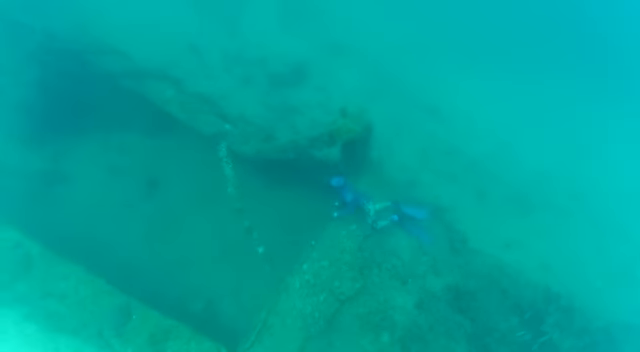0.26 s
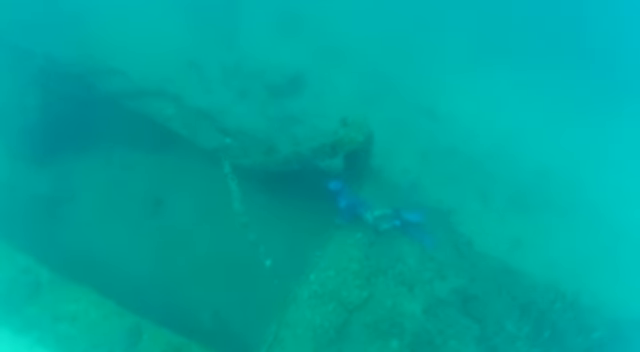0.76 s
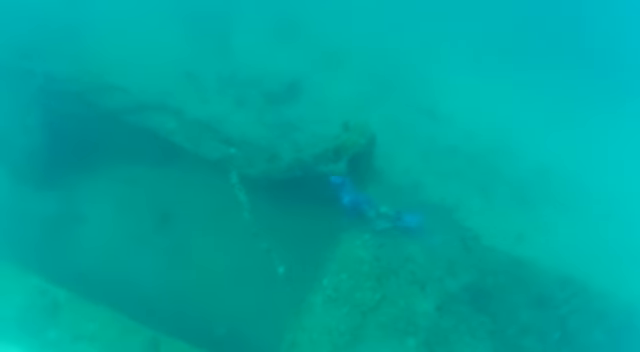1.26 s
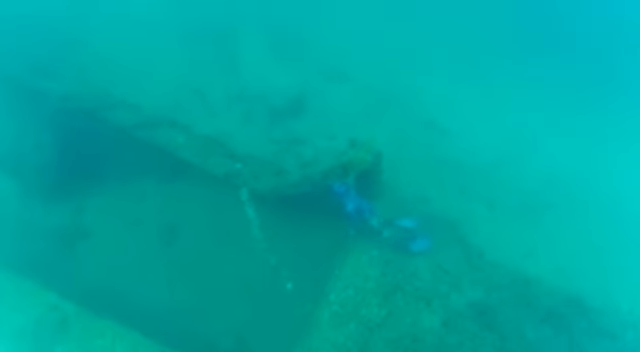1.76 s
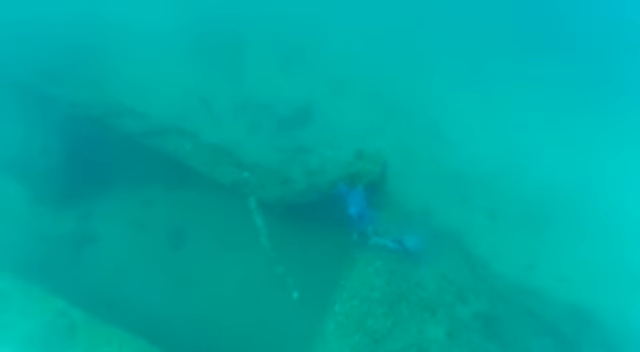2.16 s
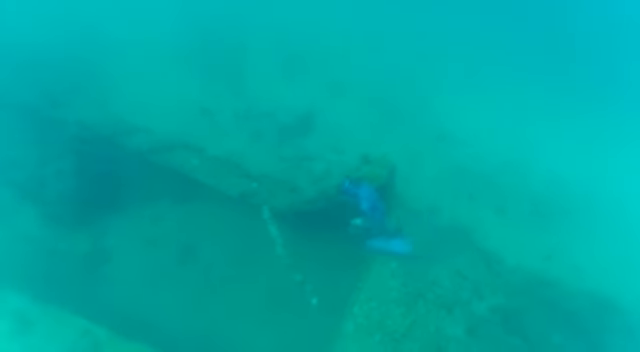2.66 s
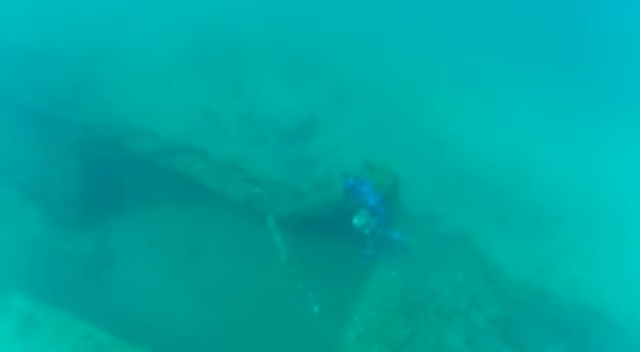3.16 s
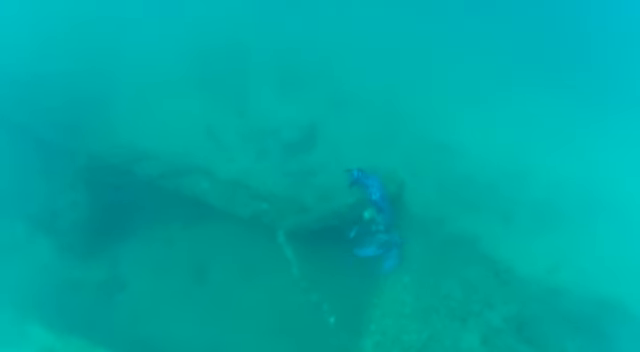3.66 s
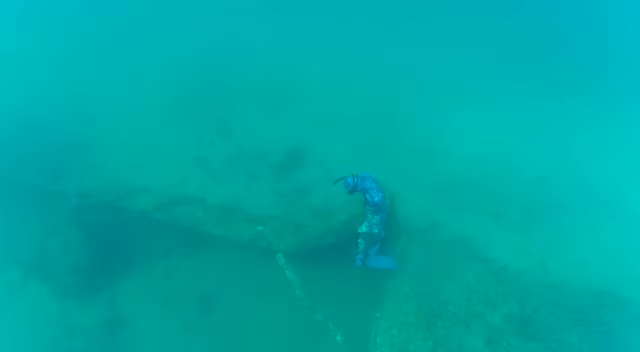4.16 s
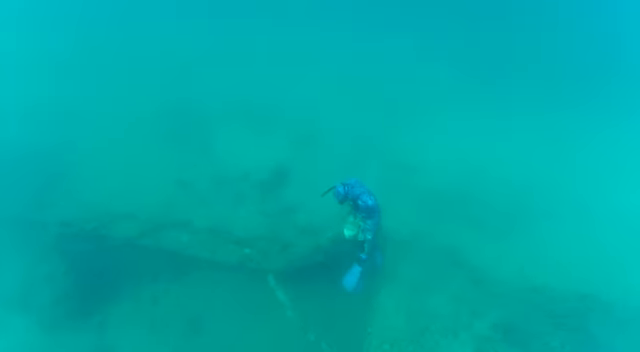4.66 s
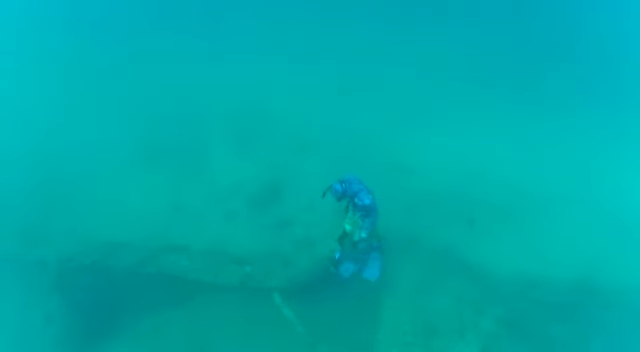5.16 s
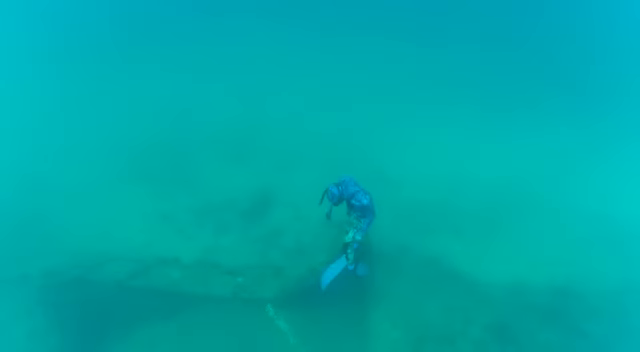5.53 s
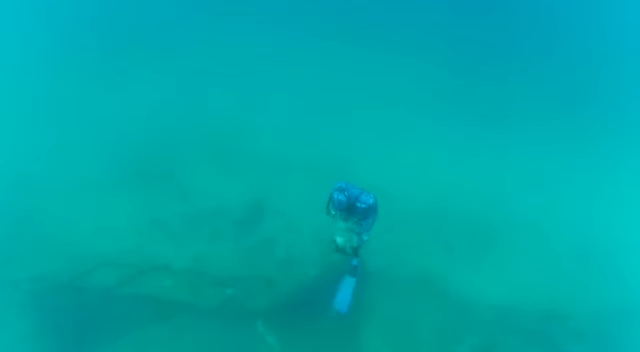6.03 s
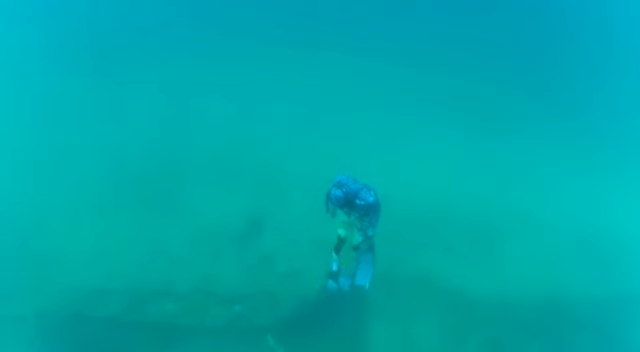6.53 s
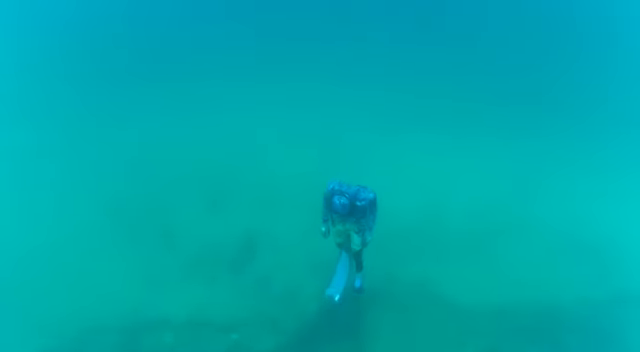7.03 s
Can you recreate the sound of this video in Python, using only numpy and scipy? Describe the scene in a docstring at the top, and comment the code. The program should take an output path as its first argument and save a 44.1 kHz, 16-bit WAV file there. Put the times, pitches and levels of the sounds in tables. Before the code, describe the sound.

A dense crackle of snapping shrimp and scattered dull knocks over low water rumble, heard underwater through a waterproof camera case.

```python
"""Under water above a wreck, heard through a camera's resonant waterproof case. From the start a bed of
snapping shrimp fizzes over the rumble of moving water and the weak hum of a far engine. Sharp snaps close by
and soft low blips (probably far fish) join at once. Then come dull knocks, singly and in short runs, each with
faint echoes, and then faint low murmurs, probably fish too. Near the middle, two soft bumps push on the case;
the shrimp crackle on to the end."""
import sys
import numpy as np
from scipy import signal
from scipy.fft import rfft, irfft
from scipy.io import wavfile

SR = 44100
rng = np.random.default_rng(int(sys.argv[2]) if len(sys.argv) > 2 else 0)


def unload_wav(signal):
    """Save mono or channel-first audio to the path in sys.argv[1] as 16-bit WAV at rate SR, clipped to [-1, 1]."""
    wavfile.write(
        sys.argv[1],
        SR,
        np.round(np.clip(np.atleast_2d(signal).T, -1, 1) * 32767).astype(np.int16),
    )


N = 321489
HZ = np.fft.rfftfreq(N, 1 / SR)
# bands in which snaps differ from one another: (centre frequency [Hz])
BAND_HZ = [1000, 2200, 3700, 5200, 7000, 9800, 14000]


def from_db(db):
    """Amplitude ratio: a factor of ten for every 20 dB."""
    return 10 ** (np.asarray(db) / 20)


def unit_rms(x):
    """Normalisation to rms 1."""
    return x / np.sqrt(np.mean(x ** 2) + 1e-20)


def gain_at(points, hz):
    """Frequency response: gain from (frequency [Hz], level [dB]) points on a log-frequency axis."""
    f, db = np.transpose(points)
    return from_db(np.interp(np.log(hz + 1), np.log(f + 1), db))


def envelope(curve):
    """Amplitude modulation: gain from (time [s], level [dB]) points, relative to their mean level."""
    s, db = np.transpose(curve)
    return from_db(np.interp(np.arange(N) / SR, s, db - np.mean(db)))


def add(mix, s, sound):
    """Superposition: a sound joins the mix at time s."""
    part = mix[max(round(s * SR), 0):][:len(sound)]
    part += sound[:len(part)]


def drift(rate_hz):
    """Slow random fluctuation: low-passed noise of rms 1."""
    return unit_rms(irfft(rfft(rng.standard_normal(N)) * np.exp(-(HZ / rate_hz) ** 2), N))


def minimum_phase(gain):
    """Causality: the minimum-phase impulse response, of energy 1, with this spectral shape."""
    log_gain = np.log(np.maximum(np.r_[gain, gain[-2:0:-1]], 1e-5))
    ring = np.fft.ifft(np.exp(signal.hilbert(log_gain).conj())).real
    return ring / np.linalg.norm(ring)


def case_ring(size=4096):
    """Resonance: after an impulse the camera case rings in its modes."""
    # modes of the case: (frequency [Hz], width [Hz], relative level [dB])
    modes = [(930, 88, -11), (1050, 59, -6.5), (1655, 61, -11), (2034, 130, -6), (2251, 207, -1),
             (2586, 120, -5.5), (3617, 394, -8.5), (4140, 130, -8), (4553, 270, -10.5), (5162, 370, -7.5),
             (5990, 600, -14.5), (6920, 550, -8), (7340, 290, -17), (8010, 440, -14.5), (9430, 660, -16),
             (10280, 1100, -19)]
    # transmission between the modes: (frequency [Hz], relative level [dB])
    wall = [(100, -36), (450, -17.5), (750, -17.5), (1230, -19.5), (1900, -18.5), (3000, -18.5),
            (5500, -23.5), (7600, -22), (8600, -25), (11000, -22.5), (12700, -24), (14300, -22),
            (16000, -19.5)]
    hz = np.fft.rfftfreq(size, 1 / SR)
    power = sum(from_db(db) ** 2 / (1 + ((hz - f) / (0.74 * width)) ** 2) ** 2 for f, width, db in modes)
    return minimum_phase(np.sqrt(power + gain_at(wall, hz) ** 2))


def scatter(decay_s, size=4096):
    """Diffuse scattering: weak paths off the wreck and sea bed sum to a dying hiss of energy 1."""
    tail = rng.standard_normal(size) * np.exp(-np.arange(size) / SR / decay_s)
    return tail / np.linalg.norm(tail)


def snap_bands(spread_s, tail_db, tail_s, evenness=0.62, size=1024):
    """Multipath: close reflections smear a snap and far ones trail it; one row for each band."""
    hz, t = np.fft.rfftfreq(size, 1 / SR), np.arange(size) / SR
    paths = rfft(rng.standard_normal(size) * np.exp(-(t / spread_s) ** 2))
    paths /= abs(paths) ** evenness  # a strong direct path leaves only shallow notches
    paths /= np.sqrt(np.mean(abs(paths) ** 2))
    paths += from_db(tail_db) * rfft(scatter(tail_s, size))
    shares = [np.interp(hz, BAND_HZ, band) for band in np.eye(len(BAND_HZ))]
    return np.roll(irfft(shares * paths, size), size // 16, axis=1)


def shrimp_bed(per_s=1700, least_db=-48, range_db=4.5, loudest_db=-28.5, colour_db=3, focus_db=2.5,
               hiss_db=-62, patches=300):
    """A Poisson process: thousands of far snaps, mostly tiny; the farthest merge into a hiss."""
    # slow swell of the bed: (time [s], relative level [dB])
    activity = [(0, -56.5), (.6, -57.5), (1.95, -57), (2.4, -57.5), (3.6, -57.5), (4.4, -57.5), (5.8, -57),
                (7.29, -57.5)]
    out, bands = from_db(hiss_db) * rng.standard_normal(N), np.arange(len(BAND_HZ))
    growth = 1 - 0.27 * np.array(BAND_HZ) / BAND_HZ[-1]  # bigger claws add more body than treble
    for _ in range(patches):  # each patch of the bed has its own paths
        starts = np.cumsum(rng.standard_exponential(128) * SR * patches / per_s).astype(int)
        size_db = least_db + range_db * rng.standard_exponential((len(starts), 1)) * growth
        # the angle at which a snap meets the case decides which band it rings most
        favourite = rng.uniform(-1, len(bands), (len(starts), 1))
        colour = colour_db * rng.standard_normal((len(starts), len(bands)))
        colour -= focus_db * abs(bands - favourite)
        colour = colour - colour.mean(0) + colour.mean()  # over many snaps no band is favoured
        gains = from_db(np.minimum(size_db + colour, loudest_db))[starts < N]
        snaps = gains @ snap_bands(spread_s=.0026, tail_db=-11, tail_s=.009, evenness=0)
        for start, snap in zip(starts, snaps):
            add(out, start / SR, snap)
    return out * envelope(activity)


def water_rumble(level_db=-47.5, surge_exponent=0.42, deep_hz=130):
    """Flow noise: water sways against the case, mostly below hearing; the deep part follows the surge."""
    # spectral density of the flow: (frequency [Hz], relative level [dB])
    density = [(1, -10), (6, -3.5), (10, 3), (20, -11), (35, -22.5), (60, -26.5), (75, -30), (100, -29),
               (118, -26), (155, -33.5), (205, -33), (240, -35.5), (290, -32.5), (420, -39), (520, -39),
               (700, -48.5), (1500, -66)]
    # push of the water on the case: (time [s], relative level [dB])
    surge = [(0, -67.5), (1, -68.5), (1.3, -62), (2.1, -62.5), (2.3, -55), (2.85, -68.5), (3.2, -53),
             (3.5, -67), (4.25, -57), (4.9, -51.5), (5.5, -64), (6.1, -58), (6.9, -63.5), (7.29, -60.5)]
    spectrum = rfft(rng.standard_normal(N)) * gain_at(density, HZ)
    steady = irfft(spectrum, N)
    deep = irfft(spectrum * np.exp(-(HZ / deep_hz) ** 2), N)
    surging = steady + deep * (envelope(surge) ** surge_exponent - 1)
    return from_db(level_db) * surging / np.std(steady)


def far_engine(waver=0.0118, fade_db=3):
    """A line spectrum: the engine's weak tones waver in pitch together and fade independently."""
    # tones of the hum: (frequency [Hz], rms level [dB])
    tones = [(87, -74.5), (116, -71), (139, -75.5), (175, -77.5), (234, -75), (352, -78)]
    wavering_t = np.cumsum(1 + waver * drift(3.73)) / SR
    return sum(from_db(db) * unit_rms(from_db(fade_db * drift(2)) * np.sin(2 * np.pi * hz * wavering_t))
               for hz, db in tones)


def near_snap(size_db, hz, fall_db, colour_db=1.3):
    """A broadband impulse: a bright snap arrives as one tick, a dull one spread over many paths."""
    octaves = np.log2(np.maximum(BAND_HZ, BAND_HZ[1]) / hz)
    trim_db = np.array([-7, 0, 0, 0, 0, -2.5, -2.5])  # weakens the lowest band and the top two
    band_db = size_db - fall_db * abs(octaves) + trim_db + colour_db * rng.standard_normal(len(octaves))
    spread_s = 0.002 * np.exp(-.22 * fall_db / 6 * np.log2(hz / BAND_HZ[3]))
    return from_db(band_db) @ snap_bands(spread_s, tail_db=-14, tail_s=0.037, evenness=0.81)


def near_shrimp(lead_s=64 / SR):
    """Discrete transients: the closest shrimp stand out of the bed, each heard by itself."""
    # near snaps: (time [s], relative level [dB], centre frequency [Hz], fall to either side [dB/octave])
    snaps = [(.0214, -18.5, 2300, 9), (.1528, -17.5, 2100, 11), (.1744, -23.5, 6000, 7),
             (.3022, -23.5, 2500, 3.5), (.463, -21.5, 2300, 14), (.5828, -17, 11000, 9),
             (.816, -14.5, 11500, 10), (.82, -24, 3000, 2), (.882, -21.5, 2100, 2),
             (1.0288, -21.5, 8500, 6), (1.2258, -22, 2100, 13), (1.2705, -21.5, 2800, 11),
             (1.3492, -19, 2600, 11), (1.55, -20.5, 2200, 4), (1.7246, -17.5, 2940, 7.5),
             (1.8415, -22.5, 3000, 6), (1.9243, -13, 3800, 5), (1.9317, -10, 4070, 8),
             (1.9487, -21, 2200, 10), (2.0018, -19.5, 2400, 10), (2.0203, -19, 2300, 11),
             (2.22, -23, 2100, 15), (2.3076, -21.5, 3900, 9), (2.3538, -21, 12000, 5),
             (2.4909, -22, 12000, 6), (2.53, -21.5, 2000, 4.5), (2.674, -19, 2100, 20),
             (2.848, -22, 3200, 5), (2.9177, -8.5, 2700, 12), (2.9323, -22, 2700, 5), (3.081, -21, 4000, 5),
             (3.3444, -17, 6140, 8), (3.4401, -19, 2600, 10), (3.4764, -21, 7000, 5),
             (3.5009, -17.5, 2100, 14), (3.673, -18, 2000, 12), (3.7188, -17, 2100, 6),
             (3.738, -19, 2500, 11), (4.102, -20.5, 2300, 11), (4.179, -21, 9000, 11),
             (4.1971, -21, 7500, 12), (4.381, -13, 14000, 8), (4.4203, -17.5, 2100, 14),
             (4.442, -22.5, 13000, 2), (4.4805, -21, 6300, 8), (4.4883, -23, 6800, 9),
             (4.563, -18.5, 2010, 14), (4.6437, -16.5, 2400, 13), (4.728, -12, 2000, 14.5),
             (4.7873, -19, 2000, 12), (4.806, -22, 7500, 8), (4.8117, -13, 9000, 11),
             (4.9304, -19.5, 13000, 5.5), (4.9998, -18.5, 5500, 11), (5.012, -21, 5500, 13),
             (5.1462, -13, 2200, 8), (5.15, -20.5, 2300, 8), (5.1977, -12, 4400, 7.5),
             (5.2027, -16.5, 2200, 8), (5.2059, -9, 6600, 10), (5.5136, -20.5, 7500, 9),
             (5.9769, -14, 2300, 6), (6.0953, -19, 12500, 7), (6.3294, -21, 13000, 6),
             (6.439, -19, 2100, 11), (6.6002, -25, 4000, 6), (6.622, -16.5, 2400, 11),
             (6.7068, -21, 2300, 11), (6.753, -14, 2600, 14), (6.809, -20, 11500, 10),
             (7.205, -16, 5000, 4.5)]
    out = np.zeros(N)
    for s, size_db, hz, fall_db in snaps:
        add(out, s - lead_s, near_snap(size_db, hz, fall_db))
    return out


def neighbour_shrimp(per_s, size_db, hz, fall_db, scatter_octaves, scatter_db=0.5):
    """A jittered pulse train: shrimp a little farther off snap at loose intervals, alike in size."""
    out = np.zeros(N)
    count = int(per_s * N / SR) + 1
    for k, (place, size, pitch) in enumerate(rng.uniform(-1, 1, (count, 3))):
        snap = near_snap(size_db + scatter_db * size, hz * 2 ** (scatter_octaves * pitch), fall_db)
        add(out, (k + (1 + place) / 2) / per_s, snap)
    return out


def soft_blips(rise_s=.004):
    """Damped oscillation: a short run of soft low blips and a few lone ones, probably far fish."""
    # blips: (time [s], peak level [dB], frequency [Hz])
    blips = [(.124, -56, 483), (.157, -57, 475), (.19, -56, 485), (.222, -57, 480), (.266, -55, 525),
             (.475, -56, 600), (1.025, -59, 517), (1.075, -57, 530)]
    out, t = np.zeros(N), np.arange(SR // 20) / SR
    swell = t / rise_s * np.exp(1 - t / rise_s)
    for s, db, hz in blips:
        add(out, s - rise_s, from_db(db) * swell * np.sin(2 * np.pi * hz * t))
    return out


def snap_flurries(per_s=500):
    """Temporal fusion: dull snaps milliseconds apart are heard as one gritty scratch."""
    # flurries from farther off: (time [s], duration [s], relative level [dB])
    flurries = [(.165, .025, -54), (.435, .03, -55), (.775, .02, -55), (1.562, .012, -52), (2.17, .02, -56),
                (4.778, .018, -53), (6.705, .02, -55)]
    # dulling with distance: (frequency [Hz], gain [dB])
    dulling = [(1000, -4), (2200, 0), (4000, 0), (7000, -6), (14000, -9)]
    out = np.zeros(N)
    for s, length_s, db in flurries:
        gains = from_db(db) * np.sqrt(SR / per_s) * gain_at(dulling, np.array(BAND_HZ))
        for place in rng.random(round(per_s * length_s)):
            add(out, s + place * length_s, gains @ snap_bands(spread_s=.0018, tail_db=-8, tail_s=.008))
    return out


def knocks(edge_db=8, rise_s=0.00063, fall_s=0.0016, wreck_db=-17, wreck_s=0.003044, surface_db=-15,
           surface_s=0.014, tail_db=-7.5, case_db=-13, low_cut_hz=400, size=1024):
    """Reflection: a short, sharp-edged pulse echoes off the wreck and surface and rattles the case."""
    # knocks: (time [s], body level [dB], frequency [Hz], hardness of the edge [dB])
    pulses = [(0.3254, -35.5, 680, 0.5), (0.5001, -36.5, 825, -7), (0.7199, -34.5, 685, 0.5),
              (0.8642, -47.5, 756, 1), (1.3465, -34.5, 716, 2), (1.434, -35.5, 715, 3),
              (1.505, -48, 750, 7), (1.5665, -46.5, 840, 8), (1.597, -35, 700, 1), (1.618, -50, 740, 9),
              (1.7937, -46.5, 860, 10), (1.8183, -49.5, 880, 12), (1.8274, -51, 895, 14),
              (1.844, -53, 810, 14), (1.89, -48.5, 700, 5), (2.1512, -48.5, 830, 10),
              (2.8645, -35, 776, -18), (3.1574, -41, 940, -7), (3.1843, -45.5, 940, 3),
              (3.325, -44, 724, 1), (3.9561, -42.5, 746, 1.5), (4.0577, -32.5, 780, -3),
              (5.2566, -32.5, 784, -18), (5.331, -36, 830, -19), (5.3708, -35, 830, -1),
              (5.3767, -35, 830, -1), (5.4018, -38.5, 850, 0), (5.418, -44, 880, 2),
              (5.4339, -46.5, 860, -4), (6.362, -45, 800, -10), (6.4335, -30.5, 815, -5),
              (6.7572, -28.5, 856, -20)]
    # ripple that the case gives to the sharp edge: (frequency [Hz], relative level [dB])
    ripple = [(380, -16), (560, -12), (1020, -1.5), (1220, -4), (1380, -2), (1650, -2.5), (1820, -4.5),
              (2050, 0), (2550, -6), (3000, -16), (3600, -18), (5000, -28), (9000, -39)]
    # narrow band that the hollow of the case absorbs: (frequency [Hz], width [Hz])
    hollow = (1228, 97)
    out, rattle, t = np.zeros(N), np.zeros(N), (np.arange(size) - size // 8) / SR
    edge = minimum_phase(gain_at(ripple, np.fft.rfftfreq(size, 1 / SR)))
    edge = np.roll(edge, size // 8 - 4)  # lands on the crest of the swell
    swell = np.exp(-(t / np.where(t < 0, rise_s, fall_s)) ** 2)
    for s, db, hz, hard_db in pulses:
        body = swell * np.cos(2 * np.pi * hz * t)
        knock = from_db(db) * (body + from_db(hard_db + edge_db) * edge)
        start = s + t[0]
        add(out, start, knock)
        add(out, start + wreck_s, from_db(wreck_db) * knock)
        # reflection at the surface inverts the pressure
        add(out, start + surface_s * rng.uniform(.94, 1.2), -from_db(surface_db) * knock)
        add(out, start + wreck_s, from_db(tail_db) * signal.fftconvolve(knock, scatter(decay_s=0.01)))
        add(rattle, start, signal.fftconvolve(knock, scatter(decay_s=0.0091)))
    out += from_db(case_db) * signal.oaconvolve(rattle, case_ring())[:N]
    out = signal.lfilter(*signal.iirnotch(hollow[0], hollow[0] / hollow[1], fs=SR), out)
    return signal.sosfiltfilt(signal.butter(4, low_cut_hz, "high", fs=SR, output="sos"), out)


def far_murmurs(per_s=200, pitch_spread=.13, decay_s=0.005):
    """Incoherent summation: many soft blips merge into short low murmurs, probably far fish croaking."""
    # murmurs: (start [s], end [s], rms level [dB], centre frequency [Hz])
    murmurs = [(0.753, 1.101, -73, 537), (1.302, 1.652, -70.5, 460), (2.197, 2.595, -72, 416),
               (3.2, 3.55, -73, 472), (4.652, 5.049, -71.5, 470), (5.151, 5.453, -72, 484),
               (5.679, 5.903, -76.5, 488), (6.047, 6.497, -71.5, 478), (6.847, 7.1, -72, 468)]
    out, t = np.zeros(N), np.arange(SR // 20) / SR
    swell = t * np.exp(-t / decay_s)
    for start, end, db, hz in murmurs:
        murmur = np.zeros(round((end - start) * SR) + len(t))
        for place, size, pitch in rng.random((int(per_s * (end - start)), 3)):
            blip_hz = hz * (1 + pitch_spread * (2 * pitch - 1))
            add(murmur, place * (end - start), size * swell * np.sin(2 * np.pi * blip_hz * t))
        add(out, start, from_db(db) * unit_rms(murmur))
    return out


def case_bumps():
    """Heavy damping: a soft push on the case makes one swing in and out."""
    # bumps: (time [s], peak level [dB], frequency [Hz])
    bumps = [(3.212, -40, 66), (4.216, -51, 70)]
    out, t = np.zeros(N), np.arange(-SR // 20, SR // 20) / SR
    for s, db, hz in bumps:
        phase = 2 * np.pi * hz * t
        add(out, s + t[0], from_db(db) * np.cos(phase) * np.exp(-abs(phase) / 2))
    return out


def scene(side_db=-19, side_hz=110):
    """Convolution and superposition: snaps ring the case; only the rumble differs between the ears."""
    pops = neighbour_shrimp(per_s=2.5, size_db=-24, hz=2150, fall_db=13, scatter_octaves=0.22)
    ticks = neighbour_shrimp(per_s=3, size_db=-26.5, hz=9500, fall_db=9.5, scatter_octaves=0.93)
    crackle = signal.oaconvolve(near_shrimp() + pops + ticks + shrimp_bed(), case_ring())[:N]
    middle = crackle + knocks() + water_rumble() + far_murmurs() + soft_blips()
    middle += far_engine() + case_bumps()
    low_pass = signal.butter(1, side_hz, fs=SR, output="sos")
    side = from_db(side_db) * signal.sosfilt(low_pass, water_rumble())
    return np.array([middle + side, middle - side])


def record(dry, cutoff_hz=15400):
    """Band limiting: the camera passes nothing of the highest treble."""
    low_pass = signal.firwin(161, cutoff_hz, window=("kaiser", 8), fs=SR)
    return signal.oaconvolve(dry, low_pass[None], "same", axes=1)


dry = scene()
out = record(dry)
unload_wav(out)
```